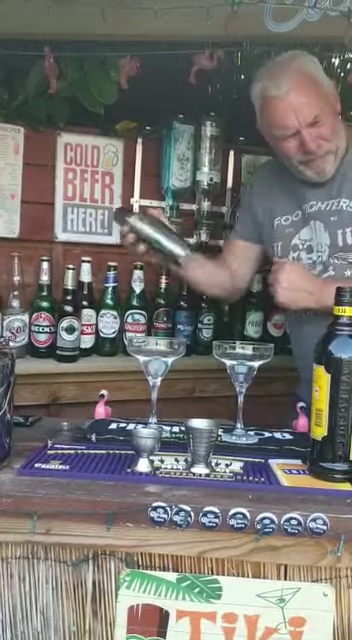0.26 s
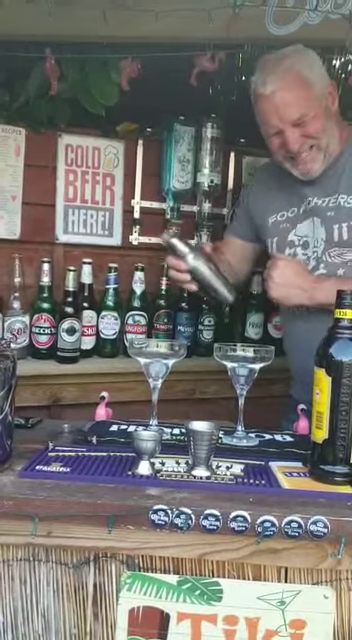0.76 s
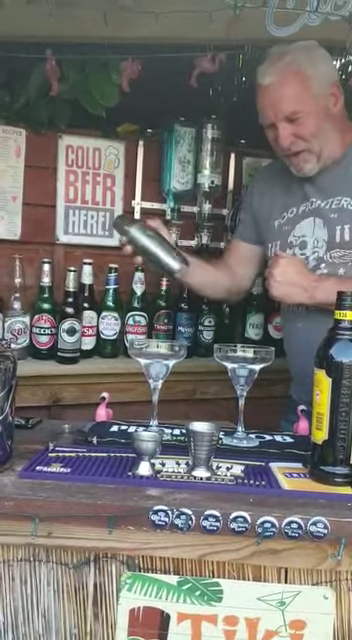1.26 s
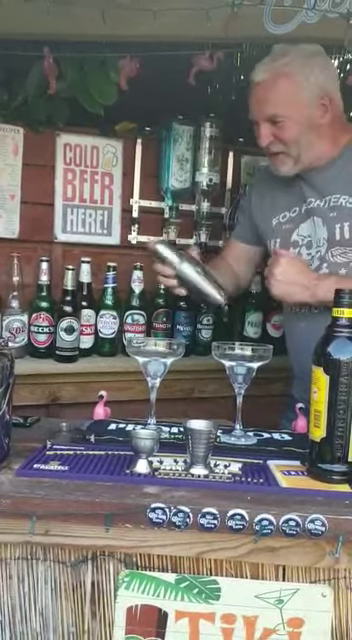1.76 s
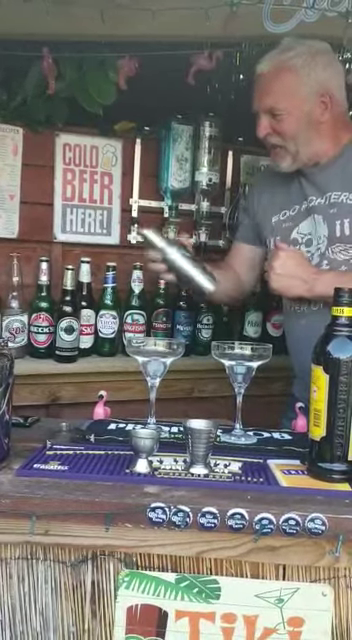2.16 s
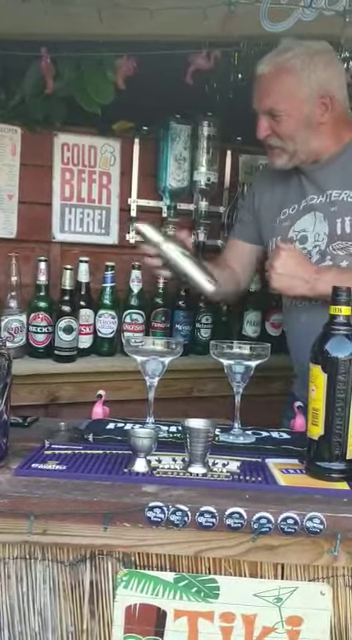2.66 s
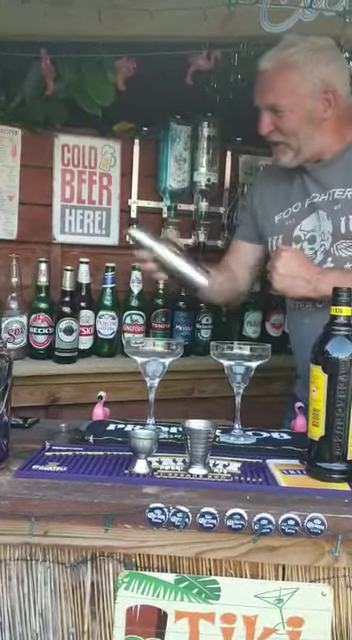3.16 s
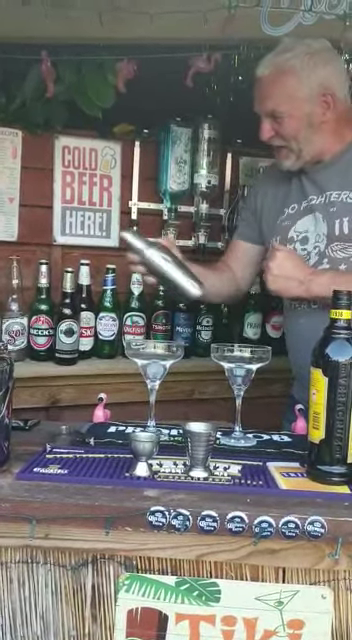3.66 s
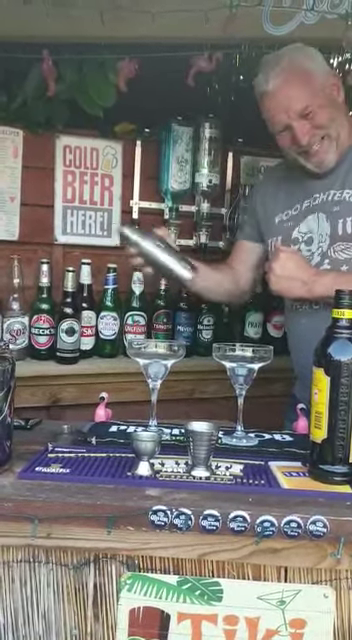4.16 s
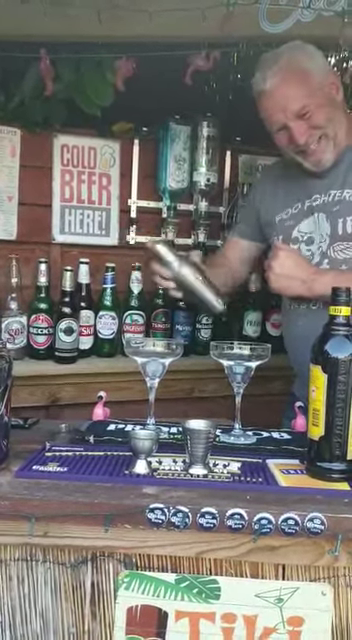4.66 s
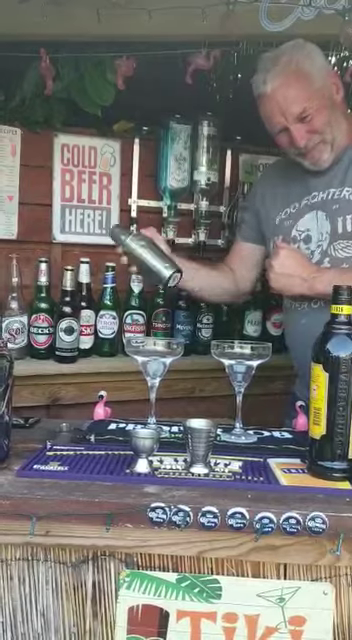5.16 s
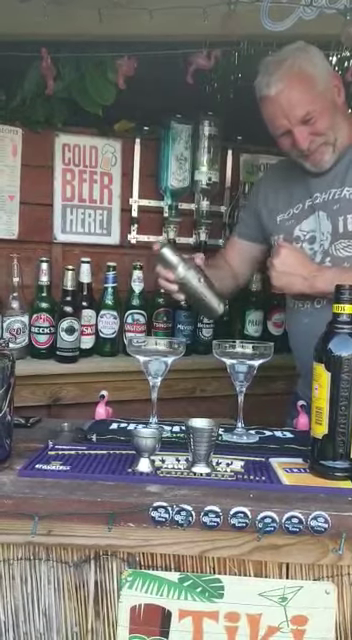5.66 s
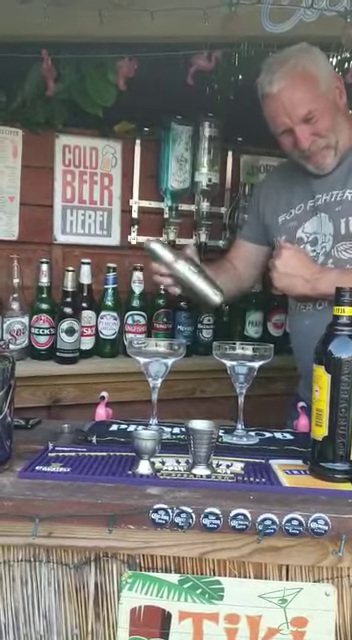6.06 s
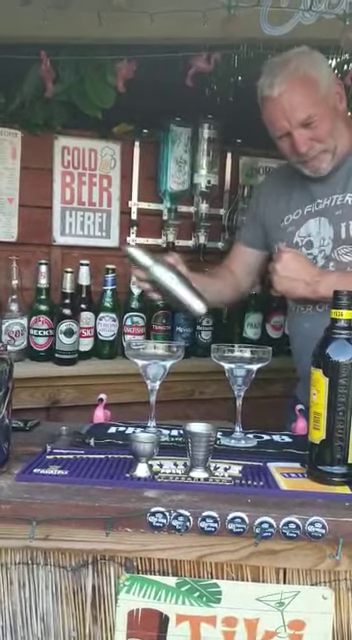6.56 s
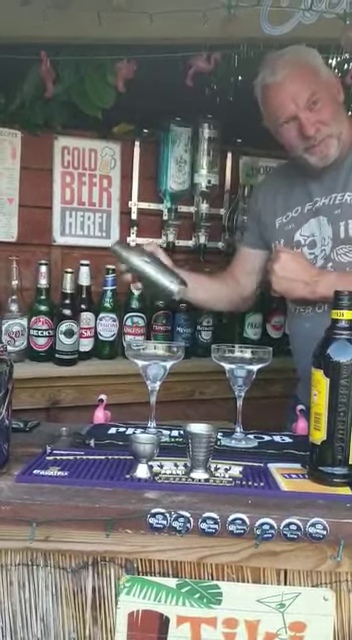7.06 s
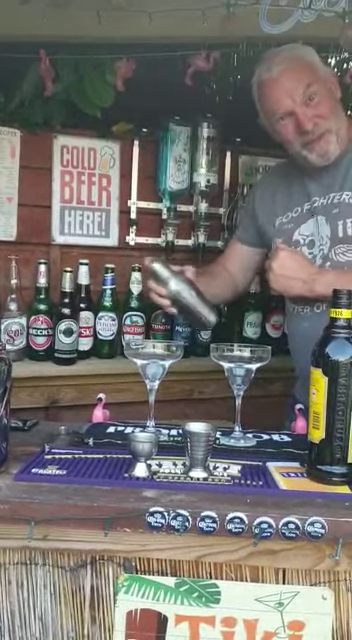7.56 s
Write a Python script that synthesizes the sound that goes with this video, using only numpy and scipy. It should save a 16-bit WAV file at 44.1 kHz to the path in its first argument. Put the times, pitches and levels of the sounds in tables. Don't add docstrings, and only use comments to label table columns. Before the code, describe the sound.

A metal cocktail shaker full of ice and liquid is shaken briskly, close to a phone microphone, from beginning to end. About ten strokes a second alternate a duller base thud and a brighter cap-end hit, each with a burst of icy crackle. Single cubes clack and small chips tick between strokes. A faint fridge hum and low rumble sit underneath, with short echoes from a small wooden bar.

```python
import sys
import numpy as np
from scipy import signal
from scipy.fft import rfft, irfft, next_fast_len
from scipy.io import wavfile
from scipy.ndimage import map_coordinates

SR = 44100
rng = np.random.default_rng(int(sys.argv[2]) if len(sys.argv) > 2 else 0)


def dump_mix(stems):
    frames = np.atleast_2d(stems).T
    limited = np.clip(frames, -1, 1)
    pcm = np.round(limited * 32767).astype(np.int16)
    wavfile.write(sys.argv[1], SR, pcm)


def voltage_ratio(level):
    return 10 ** (np.asarray(level, float) / 20)


N = 344421


def unit(x):
    return x / np.sqrt(np.mean(x ** 2) + 1e-20)


def along(points, hz):
    f, v = np.transpose(points)
    return np.interp(np.log(hz + 1), np.log(f + 1), v)


def curve(rows):
    s, value = np.transpose(rows)
    return np.interp(np.arange(N) / SR, s, value)


def wobble(rate_hz):
    knots = rng.standard_normal(int(N * rate_hz / SR) + 4)
    return map_coordinates(knots, [np.arange(N) * rate_hz / SR])


def filtered(x, response):
    m = next_fast_len(N + SR // 2)
    return irfft(rfft(x, m) * response(np.fft.rfftfreq(m, 1 / SR)), m)[..., :N]


def modes(table):
    f = np.fft.rfftfreq(4096, 1 / SR)
    spectrum = 0
    for k, (centre, width, db) in enumerate(table):
        damping = 1j * f * width
        spectrum = spectrum + (-1) ** k * voltage_ratio(db) * damping / (centre ** 2 - f ** 2 + damping)
    h = irfft(spectrum)
    return h / np.linalg.norm(h)


def causal(spectrum):
    cepstrum = irfft(np.log(voltage_ratio(along(spectrum, np.fft.rfftfreq(512, 1 / SR))) + 1e-4))
    cepstrum[1:256] *= 2
    cepstrum[257:] = 0
    h = irfft(np.exp(rfft(cepstrum)))
    return h / np.linalg.norm(h)


# frequency_hz, level_db (rms)
HUM_TONES = [(99.8, -48), (199.6, -69.5), (299.3, -62), (399.1, -60.5)]
# time_s, level_db
RUMBLE_LEVEL = [(0.0, -60), (1.65, -61), (1.72, -58), (7.68, -52.5), (7.81, -56.5)]
# frequency_hz, density_db (per Hz)
MOTOR_SPECTRUM = [(25, -25), (38, -1), (48, 12), (62, 4), (85, -14), (130, -73)]
# frequency_hz, density_db (per Hz)
AIR_SPECTRUM = [(50, -8), (80, 16), (130, 8.5), (250, 7), (500, -4), (1500, -3), (8000, -38)]


def fridge():
    t = np.arange(N) / SR
    hum = 0
    for hz, db in HUM_TONES:
        level = voltage_ratio(db + 0.17 * wobble(6.7)) * np.sqrt(2)
        hum = hum + level * np.sin(2 * np.pi * hz * t + 0.13 * wobble(2.4))
    motor = filtered(rng.standard_normal(N), lambda hz: voltage_ratio(along(MOTOR_SPECTRUM, hz)))
    rumble = voltage_ratio(curve(RUMBLE_LEVEL)) * unit(motor)
    a, b = filtered(rng.standard_normal((2, N)), lambda hz: voltage_ratio(along(AIR_SPECTRUM, hz)))
    air = voltage_ratio(-58.5) * unit(np.array([a + 0.12 * b, a - 0.35 * b]))
    return (hum + rumble + air) * voltage_ratio(np.array([[1.4], [-1.4]]))


# time_s, level_db
SLOSH_LEVEL = [(0.0, -39), (3.57, -37), (3.78, -38.5), (7.09, -38.5), (7.81, -42)]


def slosh():
    wall_db = curve(SLOSH_LEVEL)
    fizz_db = -38.5 + 1.9 * (wall_db - wall_db.mean())
    wake = 7 * np.exp(-np.arange(N) / SR / 0.041)
    swirl = 3.48 * wobble(110) + wake
    fizz_swirl = 1.1 * swirl + 0.89 * wobble(90) + 2.4 * wobble(14)
    return [voltage_ratio(wall_db - 6 + swirl), voltage_ratio(wall_db + 0.5 + swirl), voltage_ratio(fizz_db - 1.5 + fizz_swirl)]


# start_s, lead_cube_db, ice_mass_db,
# brightness_db
STROKES = [(0.03, -9, -20, -1.5), (0.137, -16, -21, 2.5), (0.237, -6.5, -19.5, 0),
           (0.347, -4, -18.5, 5), (0.436, -9, -17.5, 2), (0.543, -10.5, -20, 4.5),
           (0.645, -13, -22.5, 2), (0.74, -9.5, -19, 2), (0.834, -11, -21, -1),
           (0.941, -10.5, -17.5, -0.5), (1.04, -12, -18.5, -3), (1.137, -13, -21.5, 7),
           (1.235, -11, -20.5, 2), (1.341, -13, -22.5, 3), (1.45, -8, -26.5, 4.5),
           (1.55, -12, -19, 1), (1.644, -7.5, -22.5, 3.5), (1.748, -8.5, -18, 2),
           (1.842, -7, -21, -2), (1.95, -16.5, -22.5, 5), (2.043, -13.5, -19, 0.5),
           (2.146, -20, -19, 4.5), (2.256, -10.5, -18.5, -3), (2.366, -10.5, -21.5, 6),
           (2.466, -8, -19, 0), (2.577, -11, -19, 4),
           (2.68, -7.5, -20, -5), (2.789, -12, -17, 0.5), (2.886, -6, -22.5, -1.5),
                  (2.983, -8, -23, 6), (3.073, -8.5, -18.5, -3), (3.175, -9, -21.5, 10),
                  (3.27, -10, -18.5, -1.5), (3.376, -7.5, -19, 5.5), (3.473, -10.5, -22.5, 0),
                  (3.576, -5, -21.5, 6.5), (3.667, -10, -23, -2), (3.775, -21, -21, 4.5),
                  (3.883, -12.5, -25.5, 2), (3.969, -18.5, -18.5, 5.5), (4.073, -13, -23.5, -2),
                  (4.19, -2.5, -20.5, 7), (4.28, -15, -20.5, 1.5), (4.408, -16, -19.5, -1),
                  (4.503, -10.5, -23, 0.5), (4.61, -14, -20, 5.5), (4.714, -11.5, -22, 0),
                  (4.835, -7, -20, 2), (4.925, -9, -20.5, -4), (5.022, -15, -20.5, 3),
                  (5.121, -13, -22.5, -5), (5.226, -13.5, -19, 2),
           (5.318, -7.5, -22.5, -1), (5.429, -18, -20, 2), (5.533, -15, -22, 0.5),
                (5.642, -12, -19.5, 3.5), (5.733, -10, -22.5, -0.5), (5.848, -9.5, -18, -1.5),
                (5.932, -14, -19, 1.5), (6.056, -16, -21, 0), (6.158, -10.5, -19.5, -4.5),
                (6.27, -13, -18, 1), (6.363, -9, -19.5, -2.5), (6.479, -6.5, -22.5, 2.5),
                (6.569, -11.5, -20, -3.5), (6.683, -7, -20.5, 1.5), (6.781, -3.5, -24.5, -2),
                (6.892, -7, -22.5, 2.5), (6.999, -12.5, -22, 2), (7.104, -10.5, -20.5, 3.5),
                (7.199, -5.5, -22, 2), (7.317, -16, -20.5, 5), (7.424, -16, -21, 0.5), (7.554, -9, -23, 5),
                (7.652, -8.5, -22, -6), (7.761, -26, -23.5, 6.5)]
# start_s, lead_cube_db, ice_mass_db
LOOSE_ICE = [(0.164, -4, -26), (0.42, -12, -25), (0.532, -19, -23), (0.958, -13, -21.5), (1.218, -9.5, -22),
             (1.827, -16, -25.5), (1.966, -12, -26), (2.433, -12, -26.5), (2.591, -5, -27),
             (2.65, -19, -27), (3.0, -6, -22), (3.455, -14, -27), (4.485, -16, -28), (4.683, -16, -24.5),
             (4.817, -12, -25.5), (5.091, -30, -25), (5.304, -10, -30), (5.343, -11.5, -26),
             (5.515, -11, -23.5), (5.913, -12, -28), (6.069, -8, -26.5), (6.131, -13, -28.5),
             (6.177, -12, -25), (6.346, -20, -30), (6.458, -12, -26), (6.52, -24, -20.5),
             (6.735, -27, -26.5), (6.979, -15, -27), (7.228, -6.5, -23.5), (7.614, -17, -25.5)]


def blows():
    strokes = STROKES
    # base thud dB, wall ring dB, crackle dB; first cube's trim dB and pitch Hz
    base_end = (-1, -1.5, 0.5, -2, 1322)
    cap_end = (-8.5, -1.5, 1.06, -4, 2462)
    side_wall = (-8, -1, 0.7, -4.5, 2250)
    s, lead_db, mass_db, bright_db = np.transpose(strokes + [(*row, 0) for row in LOOSE_ICE])
    kind = [base_end, cap_end] * (len(strokes) // 2) + [side_wall] * len(LOOSE_ICE)
    base_db, wall_db, crackle_db, trim_db, hz = np.transpose(kind)
    thud, spot = rng.standard_normal((len(s), 2)).T
    base_db = base_db + 0.46 * thud - 0.28 * bright_db
    parts_db = mass_db + np.array([base_db, wall_db, crackle_db + bright_db])
    hard_db = lead_db - mass_db - 8
    return s, hard_db, parts_db, lead_db + trim_db, hz * np.exp(0.11 * spot)


def contacts(shape, spread_db):
    draw = rng.standard_normal(shape + (2,))
    return unit(draw[..., 0] * voltage_ratio(spread_db * draw[..., 1]))


# frequency_hz, width_hz, level_db
BASE_MODES = [(249, 89, -16), (606, 170, -4), (912, 470, -3), (1147, 207, 1.5), (1320, 244, 0),
              (1690, 420, -4.5)]
# frequency_hz, width_hz, level_db
WALL_MODES = [(1996, 145, -3.5), (2170, 124, 2), (2514, 266, -3.5), (2746, 253, -2.5), (3630, 1400, -11.5)]
# frequency_hz, density_db (per Hz)
CRACKLE_SPECTRUM = [(2000, -27.5), (3200, -6), (5000, -2), (7000, -1), (10000, -4.5), (12500, -5.5),
                    (14500, -21.5), (17500, -11)]


def ice(s, hard_db, part_db):
    lead_in_s = 0.018
    t = np.arange(SR // 11) / SR
    shared = contacts((len(s), len(t)), spread_db=7)
    grid = np.meshgrid(np.arange(len(s)), t * 650, indexing="ij")
    lumps = voltage_ratio(4.2 * map_coordinates(rng.standard_normal((len(s), 96)), grid))
    window = np.exp(-abs(t - 0.025) / 0.015)
    heft = np.mean((shared * lumps) ** 2 * window, 1) / np.mean(window)
    lumps /= np.sqrt(heft)[:, None]
    start = np.round((s - lead_in_s) * SR).astype(int)
    at = (start[:, None] + np.arange(len(t))).ravel()
    t = t - lead_in_s

    rise_s, length = 0.0022 * voltage_ratio(-2.2 * hard_db), voltage_ratio(-0.34 * hard_db)
    land = np.where(t > 0, 1 - 0.48 * np.exp(-abs(t) / rise_s), 0.21 * np.exp(t / 0.012))

    # response, t60 s, trim dB, share heard by one port only
    parts = [(modes(BASE_MODES), 0.09, -4, 0.3),
             (modes(WALL_MODES), 0.14, -5, 0.6),
             (causal(CRACKLE_SPECTRUM), 0.12, -5.5, 1.5)]
    out = np.zeros((2, N))
    for (ring, t60, trim_db, lone), db, wash in zip(parts, part_db, slosh()):
        both = 0.62 * shared + 0.5 * contacts(shared.shape, spread_db=9.5)
        decay = voltage_ratio(-60 * abs(t / t60 / length) ** 1.557)
        fall = voltage_ratio(db + trim_db)[:, None] * lumps / np.sqrt(length) * decay * land
        drive = np.linalg.norm(fall * both, axis=1, keepdims=True)
        both *= 0.78 * np.linalg.norm(fall, axis=1, keepdims=True) / drive
        liquid = contacts((N,), spread_db=7) + lone * contacts((2, N), spread_db=4.5)
        push = []
        for port in range(2):
            shower = fall * (both + lone * contacts(fall.shape, spread_db=5))
            push.append(np.bincount(at, shower.ravel(), N)[:N])
        force = (np.array(push) + wash * liquid) / np.hypot(1, lone)
        out += signal.oaconvolve(force, ring[None], axes=1)[:, :N]
    return out


def clacks(s, db, hz, cycles, snap):
    t = np.arange(SR // 100) / SR
    ring = -np.sin(2 * np.pi * hz[:, None] * t) * np.exp(-t * hz[:, None] / cycles[:, None])
    ring += snap * rng.standard_normal(ring.shape) * np.exp(-t / 0.0013)
    at = np.round(s * SR).astype(int)[:, None] + np.arange(len(t))
    sound = np.bincount(at.ravel(), (voltage_ratio(db)[:, None] * ring).ravel(), N)[:N]
    return filtered(sound, lambda f: (1j * f / (600 + 1j * f) / (1 + 1j * f / 13000)) ** 2)


# start_s, peak_db, pitch_hz
CUBE_CLACKS = [(0.398, -12.5, 2550), (0.625, -13.5, 2760), (0.844, -11.5, 2100), (1.148, -10.5, 2200),
               (2.267, -15, 1680), (3.043, -22, 2170), (3.157, -12, 2880), (3.675, -11, 1600),
               (3.991, -10.5, 2800), (4.455, -16, 2230), (4.578, -22, 2210), (4.792, -20, 2190),
               (4.933, -17, 2100), (5.034, -7.5, 2180), (5.164, -14.5, 2350), (5.408, -12.5, 2180),
               (5.67, -17, 2140), (5.7, -11, 2120), (5.753, -10, 1310), (6.249, -14.5, 2150),
               (6.387, -15, 2170), (6.433, -21, 2360), (6.792, -10, 1430), (6.909, -9, 2700),
               (6.96, -15, 2140), (7.353, -10.5, 2200), (7.393, -12.5, 2160), (7.445, -12, 2190),
               (7.561, -12.5, 1610), (7.679, -15, 1270)]


def cubes(blow_s, wall_db, lead_db, lead_hz, count):
    s, db, hz = np.hstack([np.transpose(CUBE_CLACKS), [blow_s, lead_db, lead_hz]])
    clear = clacks(s + 0.000995, db - 0.5, hz, np.full(len(s), 1.6), snap=0.98)
    s, wall_db = blow_s[:, None], wall_db[:, None]
    late, size, spot, life = rng.random((len(s), 4, count)).transpose(1, 0, 2)
    delay_s = 0.06 * late ** 1.3
    level_db = wall_db - 0.5 - 250 * delay_s - 4 * np.log(1 - 0.95 * size)
    pitch_hz = 2200 * np.exp(3.6 * (spot - 0.4) ** 3 + 0.21 * (spot - 0.4))
    cycles = 0.55 + 4 * life
    trailing = clacks((s + delay_s).ravel(), level_db.ravel(), pitch_hz.ravel(), cycles.ravel(), snap=0.67)
    return clear + trailing


# start_s, peak_db
CHIP_TICKS = [(.327, -20), (.726, -27), (1.188, -22), (1.314, -19), (1.717, -18), (2.339, -26),
              (2.948, -35), (3.494, -16), (3.753, -24), (4.159, -24), (4.390, -21), (4.766, -20),
              (5.207, -15), (5.785, -22), (5.806, -18), (5.832, -15), (5.947, -12), (6.646, -19),
              (6.862, -20), (6.940, -16), (7.020, -14), (7.067, -18), (7.185, -15), (7.295, -18)]


def chips(count):
    tick_hz = 2350
    s, db = np.transpose(CHIP_TICKS)
    when, size, spot, life = rng.random((count, 4)).T
    stray_db = -32 - 4 * np.log(1 - 0.97 * size)
    stray_hz = tick_hz * np.exp(1.28 * (spot - 0.35))
    strays = clacks(when * N / SR, stray_db, stray_hz, 0.7 + 2.2 * life, snap=0.82)
    return strays + clacks(s, db, np.full(len(s), tick_hz), np.full(len(s), 1.6), snap=0.68)


# frequency_hz, difference_db
PORT_LEAN = [(200, -2.5), (500, 8), (750, 4.5), (1200, 5.5), (1700, 6.5), (2150, 6), (2450, 8), (2900, 4.5),
             (4400, -1.5), (6000, -4.5), (7000, -0.5), (8500, -5), (11000, -2.5), (15000, 7)]
# frequency_hz, lead_rad
PORT_LEAD = [(500, 0), (3500, .6), (5500, 2.2), (8000, 3.5), (11000, 7.5), (16000, 16)]


def ports(pair):
    def both(hz):
        half = voltage_ratio(along(PORT_LEAN, hz) / 2) * np.exp(0.5j * along(PORT_LEAD, hz))
        return np.array([half, 1 / half])
    return filtered(pair, both)


# frequency_hz, t60_s
BAR_DECAY = [(300, 0.27), (2000, 0.2), (10000, 0.032)]


def bar(x, count):
    hz, t, z = signal.stft(rng.standard_normal((count, 2, SR // 6)), SR, nperseg=128)
    near = voltage_ratio(1.0 - 60 * t / 0.036)
    far = voltage_ratio(-60 * t / along(BAR_DECAY, hz)[:, None])
    tails = signal.istft(z * (near + far), SR, nperseg=128)[1]
    tails = tails / np.linalg.norm(tails[0, 0])
    place = (np.arange(N) / SR * 14 - np.arange(count)[:, None]) % count
    share = np.sin(np.pi / 2 * np.clip(1 - abs(place - 1), 0, 1))
    wet = signal.oaconvolve((x * share)[:, None], tails, axes=2).sum(0)[:, :N]
    side = np.array([[0.5], [-0.5]])
    return filtered(wet, lambda hz: voltage_ratio(along(PORT_LEAN, hz) * side) * hz / (hz + 900))


# start_s, peak_db
PORT_BUMPS = [
    (.347, -33),
    (3.375, -27),
    (4.192, -42),
]


def jolts():
    t = np.arange(N) / SR
    push = 0
    for s, db in PORT_BUMPS:
        u = np.clip(t - s, 0, None) / 0.0019
        push = push + voltage_ratio(db) * u * np.exp(1 - u)
    return push * np.array([[0.2], [-1]])


def scene():
    s, hard_db, parts_db, lead_db, lead_hz = blows()
    shaker = ice(s, hard_db[:, None], parts_db)
    shaker = shaker + cubes(s, parts_db[1], lead_db, lead_hz, count=10) + chips(count=500)
    direct = voltage_ratio(-1.03) * ports(shaker)
    echo = voltage_ratio(-5.5) * bar(shaker.mean(0), count=9)
    return direct + echo + fridge() + jolts()


def low_pass(x):
    return signal.sosfilt(signal.butter(12, 16660, fs=SR, output="sos"), x)


def record(dry):
    rounded = dry / (1 + np.abs(dry / 0.95) ** 4) ** (1 / 4)

    def band(hz):
        return 1j * hz / (30 + 1j * hz) * np.where(hz < 15750, 1, voltage_ratio(-40))
    mix = filtered(rounded, band)
    return low_pass(mix)


dry = scene()
out = record(dry)
dump_mix(out)
```